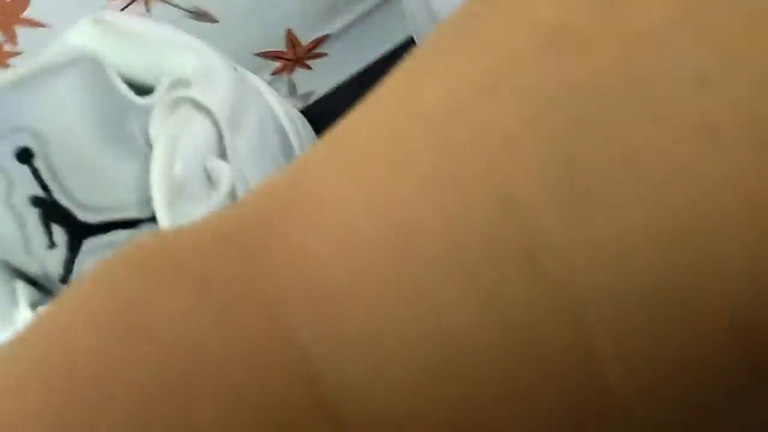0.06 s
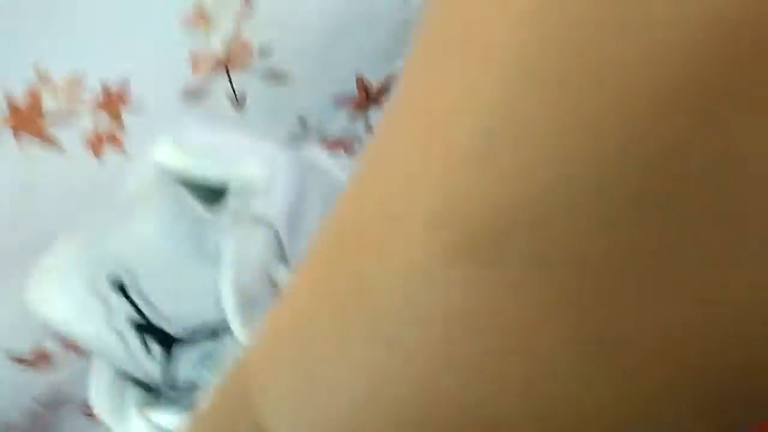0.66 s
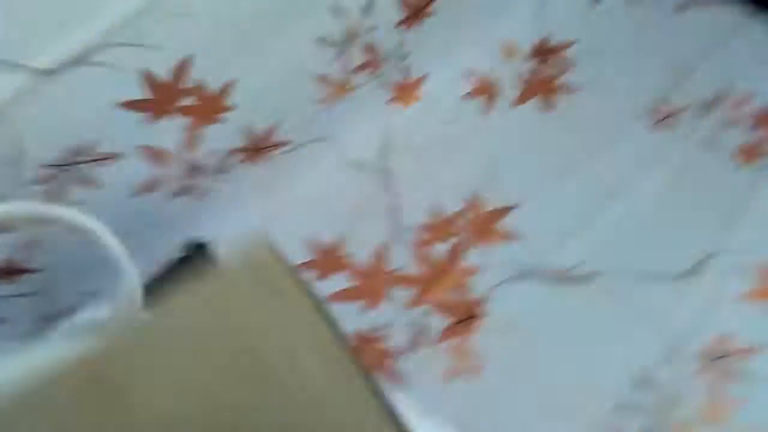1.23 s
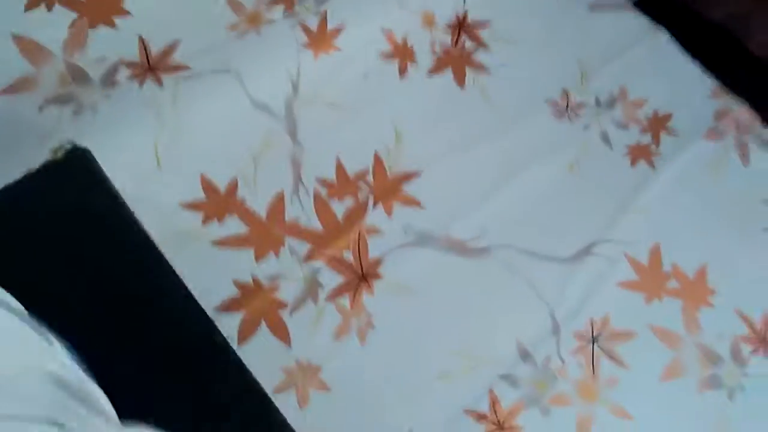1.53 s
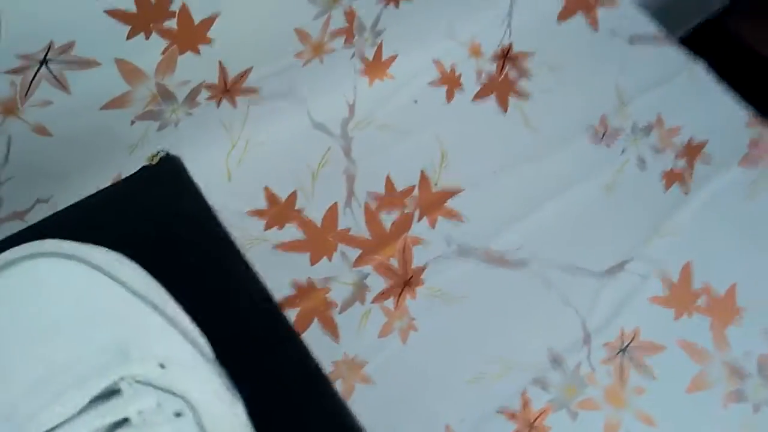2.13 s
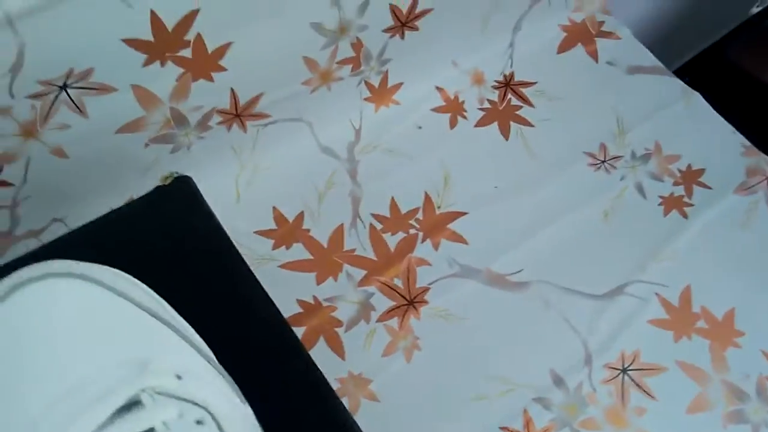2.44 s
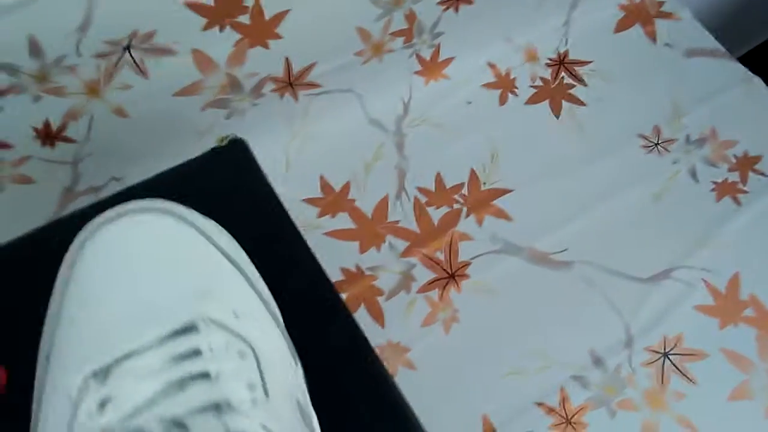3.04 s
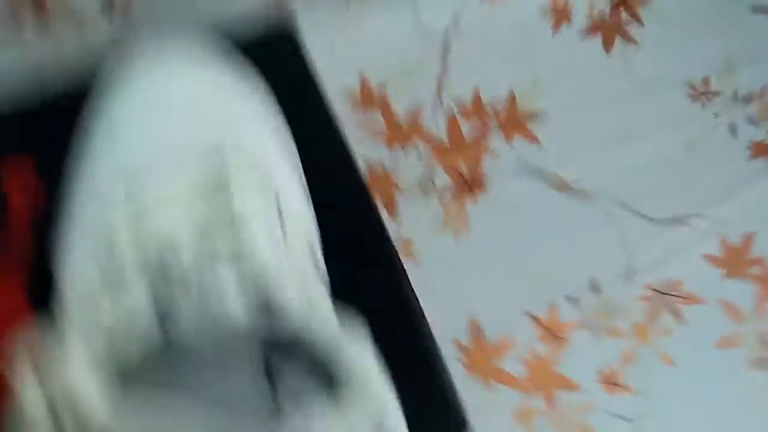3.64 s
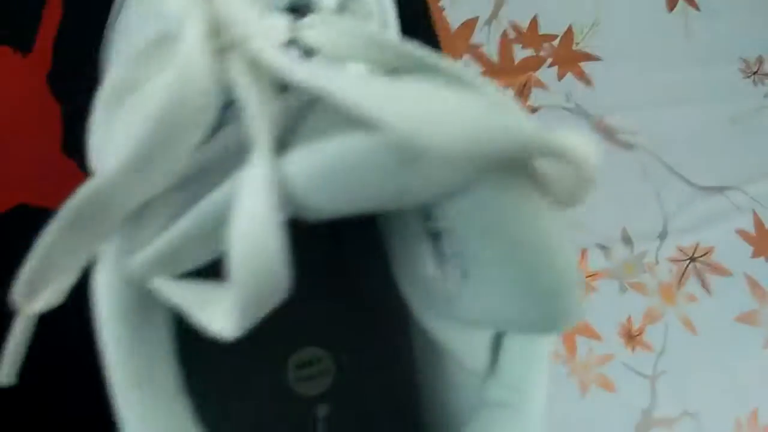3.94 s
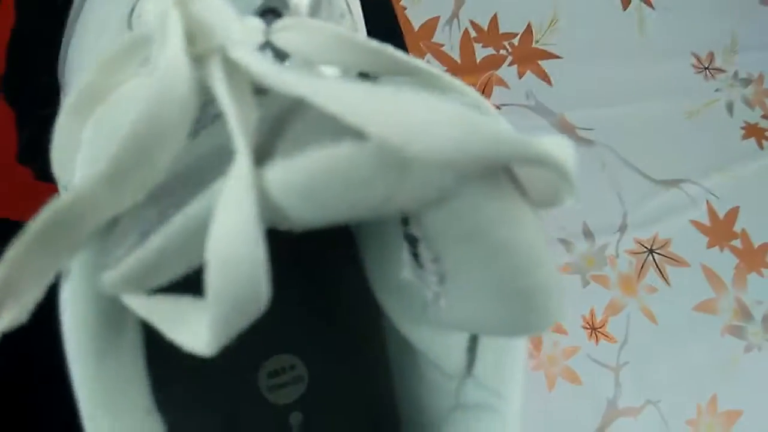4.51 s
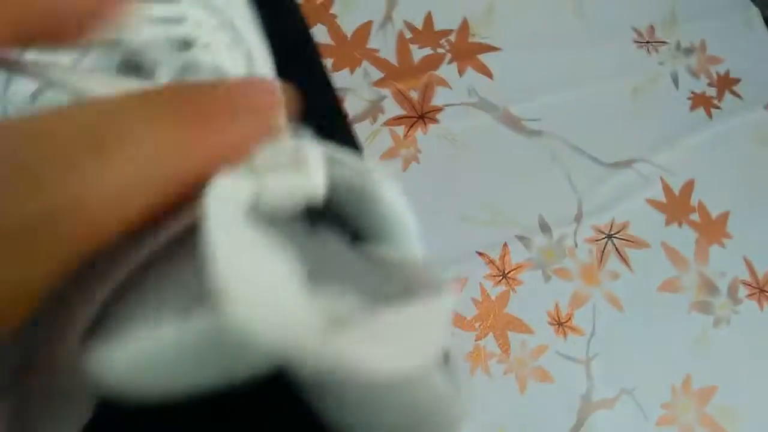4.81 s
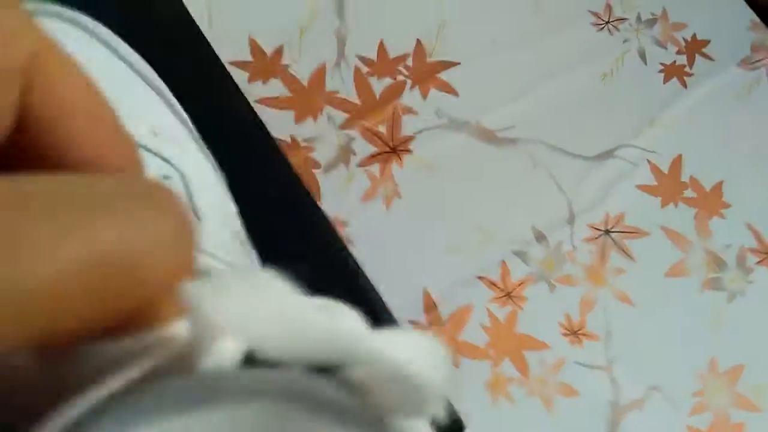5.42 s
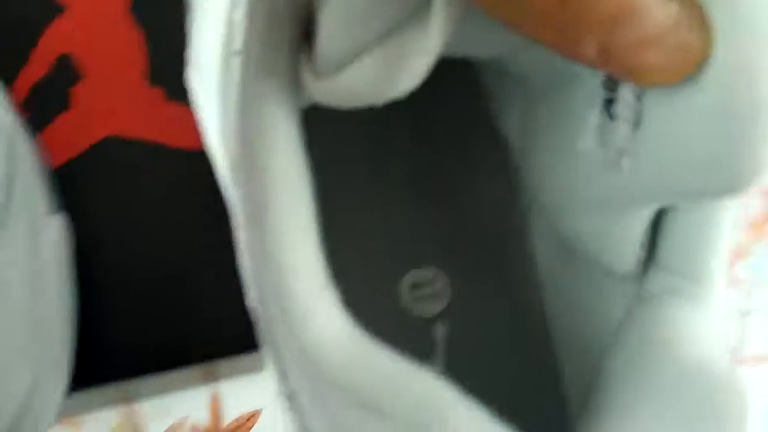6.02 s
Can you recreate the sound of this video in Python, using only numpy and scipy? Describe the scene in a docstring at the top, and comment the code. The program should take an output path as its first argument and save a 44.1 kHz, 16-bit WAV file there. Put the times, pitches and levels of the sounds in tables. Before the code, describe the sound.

A hand brushes over the microphone, then a sneaker thumps onto a cardboard box as fingers rustle its leather and laces.

```python
"""Sneaker on a shoe box

A leather sneaker is picked up, turned and set down on its cardboard box, close to a hand-held phone in
a small room. First a hand slides over the phone's case, right by the left microphone port; then fingers
brush leather and laces, the rubber sole thumps on the hollow box, and the case ticks in the grip."""
import sys
import numpy as np
from scipy import signal
from scipy.fft import rfft, irfft, next_fast_len
from scipy.io import wavfile
from scipy.ndimage import map_coordinates

SR = 44100
rng = np.random.default_rng(int(sys.argv[2]) if len(sys.argv) > 2 else 0)


def generate_wav(signal):
    """Clip the signal to [-1, 1] and save it as 16-bit WAV at the path in sys.argv[1]."""
    frames = np.transpose(np.atleast_2d(signal))
    scaled = np.clip(frames, -1, 1) * 32767
    pcm = np.round(scaled).astype(np.int16)
    wavfile.write(sys.argv[1], SR, pcm)


N = 276507

TURNED_S = 3.8  # from here on the fingers work at the collar
# resonances of the leather upper: centre_hz, width_hz, level_db
UPPER_MODES = [(550, 330, -6.5), (692, 140, 1.5), (1343, 200, 1.5), (1707, 290, -3), (2340, 460, -4.5),
               (3020, 540, -6), (4200, 1500, -7)]
# resonances of the hollow collar and tongue: centre_hz, width_hz, level_db
COLLAR_MODES = [(541, 98, -0.5), (654, 95, 3.5), (863, 140, 4), (1724, 280, -1), (2233, 910, -2.5),
                (2960, 450, 0), (4580, 900, -7)]
# bright swish of fabric: freq_hz, level_db
FABRIC_EQ = [(1500, -10), (3000, -3.5), (5000, -5), (7000, 2.5), (8200, 1.5), (9500, -5), (12500, -5),
             (14400, -6)]
# low handling rumble: freq_hz, level_db
RUMBLE_EQ = [(25, -26.5), (45, 0), (65, 1.5), (95, -3.5), (135, -1), (170, -5), (230, -6), (400, -8),
             (700, -13.5), (1500, -23.5)]
# stereo balance near the covered port: freq_hz, left_over_right_db
COVERED_PAN = [(100, -2), (350, 6.5), (800, 9.5), (2000, 8.5), (4500, 7), (7500, 0), (10000, 27),
               (14000, 16)]
# stereo balance with both ports free: freq_hz, left_over_right_db
OPEN_PAN = [(200, -1.5), (2000, 1), (6000, 2.5), (9000, 3), (11000, 10), (14000, 0.5)]


def sole_thumps(attack_s=0.0019, sole_t60_s=0.056):
    """The rubber sole gives a dead knock and rings the box modes near its own pitch."""
    # soft knocks of sole and hand: start_s, level_db, pitch_hz
    knocks = [(1.071, -32.5, 84), (1.613, -23, 239), (1.954, -16.5, 264), (2.032, -17, 237),
              (2.142, -23, 174), (2.26, -28, 176), (2.432, -19.5, 166), (2.785, -31, 202),
              (3.039, -20, 150), (3.092, -1, 222), (3.168, -17, 246), (3.286, -23.5, 73),
              (3.371, -5.5, 177), (3.391, -19.5, 84), (3.427, -22.5, 291), (3.453, -19, 260),
              (3.529, -19.5, 135), (3.563, -25, 211), (3.652, -26, 206), (3.973, -6, 316),
              (3.98, -11.5, 141), (4.107, -27, 155), (4.677, -21.5, 134), (4.778, -26.5, 151),
              (5.096, -28, 233)]
    # modes of the cardboard box: pitch_hz, level_db, t60_s
    box_modes = [(65.5, -10, 0.29), (133.6, -5.5, 0.2), (223, -3, 0.052), (257.5, -0.5, 0.039),
                 (348, -6, 0.055), (367, -17, 0.093), (478, -7.5, 0.052), (551.4, -17.5, 0.12)]
    out, t = np.zeros((2, N)), np.arange(SR // 2) / SR
    hz, mode_db, t60 = np.transpose(box_modes)[:, :, None]
    for start, db, pitch_hz in knocks:
        # the shoe loads the box a little differently each time
        strength = band(hz, pitch_hz, octaves=1.03) * amp(mode_db + rng.standard_normal(hz.shape))
        detune = 1 + 0.035 * rng.standard_normal(hz.shape)
        box = np.sum(strength * amp(-60 * t / t60) * np.sin(2 * np.pi * hz * detune * t), 0)
        sole = amp(-60 * t / sole_t60_s) * np.sin(2 * np.pi * pitch_hz * t)
        thump = (box + sole) * (1 - np.exp(-t / attack_s))
        add(out, start, amp(db - 2) * thump / abs(thump).max() * panned(-2.4))
    return out


def hand_on_case():
    """Skin hisses over the port, scrapes the case, drags in coarse slips and rocks the phone."""
    # swipes of the hand: start_s, rise_s, hold_s, hiss_db, scrape_offset_db, rocking_offset_db
    swipes = [(-.01, 0.017, 0.18, -40, -5.5, -11), (0.188, 0.031, 0.057, -44.5, -5.5, 5),
              (.27, 0.006, 0.13, -47.5, -13.5, -4.5), (.385, 0.051, 0.047, -46, -1, 6),
              (0.429, 0.18, 0.0077, -17.5, -8.5, -15), (0.595, 0.026, 0.0072, -19, -3.5, -9.5),
              (.635, 0.03, 0.1, -35, 0, 3.5), (.72, 0.05, 0.048, -20.5, -7, -6.5),
              (0.844, 0.038, 0.038, -31, -2, 3.5), (.915, 0.011, 0.077, -35.5, -6, -14.5),
              (.975, 0.044, 0.014, -49.5, -2.5, -7), (1.04, 0.0072, 0.27, -55, -10.5, -13.5)]
    # airy glide of skin: freq_hz, level_db
    hiss_eq = [(2500, -51.5), (4500, -8), (6200, 2), (8000, 4), (10000, -5), (12500, -0.5), (14400, -2.5)]
    # gritty midrange scrape: freq_hz, level_db
    scrape_eq = [(400, -19.5), (900, -5), (1450, -1), (2100, -6), (3000, -7), (5000, -7.5), (8000, -24.5)]
    # dull drag: freq_hz, level_db
    drag_eq = [(60, -31), (200, -0.5), (400, -3), (700, 3), (1000, -16.5), (2000, -16.5)]
    moves = [(start, rise, hold, db, db + scrape_db, db + rock_db)
             for start, rise, hold, db, scrape_db, rock_db in swipes]
    hiss_env, scrape_env, rock_env = pressure(moves, sag_db_per_s=30, release_s=0.057, linger_db=-15.5)
    drag_env = scrape_env.max() * (scrape_env / scrape_env.max()) ** 0.83  # grows slower than the scrape
    glide = friction(slips_per_s=4000, spread_db=2, smooth=1.4, judder_db=1.2, judder_hz=150)
    hiss = hiss_env * at_ports(glide, eq(hiss_eq), COVERED_PAN)
    crackle = grit(count=16000, spread_db=2.2, t60_s=0.007) + 0.8 * rng.standard_normal((2, N))
    scrape = scrape_env * at_ports(crackle, eq(scrape_eq), COVERED_PAN)
    slips = friction(slips_per_s=230, spread_db=1.5, smooth=0.95, judder_db=-0.5, judder_hz=480)
    drag = drag_env * at_ports(slips, eq(drag_eq), COVERED_PAN)
    jolts = friction(slips_per_s=220, spread_db=1.5, smooth=0.57, judder_db=2, judder_hz=20)
    rocking = rock_env * at_ports(jolts, eq(RUMBLE_EQ), [(100, 11)])  # leans left at every pitch
    return hiss + scrape + amp(-1.5) * drag + amp(-2) * rocking


def finger_strokes():
    """Fingers swish on the fabric and rub the upper or, once the shoe is turned, its collar."""
    # strokes over the shoe: start_s, rise_s, hold_s, swish_db, rub_db
    strokes = [(1.49, .035, 0.1, -51.5, -53.5), (1.58, 0.035, 0.017, -35, -37.5),
               (1.66, .02, 0.065, -53, -57.5), (1.795, 0.05, 0.01, -39.5, -62),
               (1.87, 0.019, 0.07, -51.5, -58.5), (1.94, 0.029, 0.014, -42, -41),
               (2.01, 0.023, 0.21, -48.5, -48.5), (2.22, 0.044, .05, -50.5, -57.5),
               (2.365, .025, 0.059, -45, -53), (2.51, 0.069, 0.068, -49.5, -47),
               (2.735, 0.032, 0.033, -44.5, -41), (2.8, .07, 0.02, -32.5, -37),
               (2.87, 0.14, 0.15, -35, -36), (3.158, 0.012, 0.081, -35.5, -34),
               (3.23, 0.042, 0.046, -26.5, -46.5), (3.33, 0.027, 0.018, -38.5, -34),
               (3.41, 0.024, 0.043, -38, -58.5), (3.51, 0.014, 0.17, -57.5, -59.5),
               (3.965, 0.014, 0.19, -44.5, -52.5), (4.15, 0.026, 0.18, -55, -84),
               (4.338, 0.0089, 0.0048, -37, -34.5), (4.355, 0.015, 0.082, -46.5, -40.5),
               (4.685, 0.022, 0.051, -52, -42.5), (4.79, 0.036, 0.061, -49, -55),
               (4.93, 0.058, 0.17, -52, -54), (5.15, .08, .3, -59, -76.5), (5.58, .17, .03, -62.5, -92),
               (6.185, 0.02, 0.07, -63, -87)]
    # the fingers leave the shoe and cut the stroke short: time_s
    lifts = [2.681, 3.128, 3.481, 4.145]
    swish_env, rub_env = pressure(strokes, sag_db_per_s=28, release_s=0.26, linger_db=-2, lifts=lifts)
    weave = friction(slips_per_s=2500, spread_db=1, smooth=1.2, judder_db=1.4, judder_hz=110)
    # threads and stitches catch
    snags = unit(friction(slips_per_s=160, spread_db=5, smooth=0, judder_db=13, judder_hz=13))
    fabric = at_ports(unit(weave) + amp(-17.5) * snags, eq(FABRIC_EQ), OPEN_PAN)
    grain = grit(count=14000, spread_db=3, t60_s=0.011) * amp(2 * wobble(40))
    force = grain + amp(-11) * snags
    upper = at_ports(force, ringing(UPPER_MODES), OPEN_PAN)
    collar = at_ports(force, ringing(COLLAR_MODES), OPEN_PAN)
    leather = np.where(np.arange(N) / SR < TURNED_S, flexing(upper), collar)
    return swish_env * fabric + amp(-3.5) * rub_env * leather


def finger_taps(octaves=0.64):
    """A short, dry crunch rings part of the shoe's shell, with a bright snap on top."""
    # fingers and lace ends tap and catch: start_s, level_db, centre_hz, t60_s
    taps = [(0.617, -11.5, 1040, 0.03), (.949, -18, 1900, 0.014), (1.874, -39, 1310, .02),
            (1.953, -34, 1300, .03), (2.5128, -20.5, 1070, 0.044), (3.033, -16.5, 2780, 0.055),
            (3.036, -10.5, 1510, 0.022), (3.092, -10.5, 1740, 0.035), (3.272, -13, 1030, 0.016),
            (3.37, -18.5, 980, 0.036), (3.451, -22, 810, 0.034), (3.531, -31.5, 893, 0.044),
            (3.9695, -25.5, 1050, 0.055), (4.018, -24, 855, 0.022), (4.3433, -20.5, 1810, 0.03),
            (4.35, -24, 2200, 0.029), (4.403, -23, 1290, 0.023), (4.411, -23.5, 1330, 0.04),
            (4.462, -28, 1250, 0.02), (4.673, -26.5, 1460, 0.032), (4.777, -29.5, 445, 0.046),
            (4.972, -35, 585, .035), (5.095, -35.5, 880, 0.03)]
    out, t = np.zeros((2, N)), np.arange(SR // 6) / SR
    for start, db, centre_hz, t60 in taps:
        envelope = hit_envelope(t, t60, attack_s=0.00049)
        balance = COVERED_PAN if start < 1 else OPEN_PAN
        shell = ringing(UPPER_MODES if start < TURNED_S else COLLAR_MODES)
        crunch = lambda colour: at_ports(envelope * rng.standard_normal((2, len(t))), colour, balance)
        body = crunch(lambda hz: shell(hz) * band(hz, centre_hz, octaves))
        crack = crunch(lambda hz: band(hz, centre_hz, octaves))
        snap = crunch(eq(FABRIC_EQ))
        tap = body + amp(-8) * crack + amp(-11) * snap
        add(out, start, amp(db - 2.5) * tap / abs(tap.mean(0)).max())
    return out


def case_ticks(t60_s=0.0068, attack_s=0.00008, slip_s=0.0015, ring_hz=4060, ring_t60_s=0.05):
    """The plastic case cracks, slips once more and rings faintly."""
    # ticks in the grip: start_s, level_db, pitch_hz, left_over_right_db
    ticks = [(0.2303, -10.5, 7400, -1), (0.3785, -6, 9200, 12), (0.3845, -11.5, 6170, -6.5),
             (0.66, -10.5, 11500, 15), (0.9038, -13.5, 5420, 11), (0.906, -4.5, 7200, 9.5),
             (0.9495, -11.5, 6170, 5.5), (1.6592, -17.5, 5950, -6.5), (1.9812, -21.5, 6740, -10.5),
             (2.017, -25.5, 6620, 6.5), (2.108, -31, 6390, -1.5), (2.5118, -32, 9000, 19),
             (3.0362, -16, 5625, 7.5), (3.0815, -9, 6700, -10), (3.271, -19, 3680, 9),
             (3.357, -16, 6800, -4), (3.627, -31, 8000, 1), (4.35, -18.5, 6160, 0), (4.373, -28, 7160, -2),
             (4.411, -22.5, 6200, 0), (4.975, -25.5, 6160, -6)]
    out, t = np.zeros((2, N)), np.arange(SR // 30) / SR
    second_slip = hit_envelope(np.maximum(t - slip_s, 0), t60_s, attack_s)
    envelope = hit_envelope(t, t60_s, attack_s) + amp(-6) * second_slip
    ring = amp(-21.5 - 60 * t / ring_t60_s) * np.sin(2 * np.pi * ring_hz * t)
    for start, db, pitch_hz, pan_db in ticks:
        burst = rng.standard_normal((2, len(t))) * envelope
        pan = lambda hz: panned(pan_db + along(OPEN_PAN, hz) - along(OPEN_PAN, pitch_hz))
        crack = filtered(burst, lambda hz: band(hz, pitch_hz, octaves=0.55) * pan(hz))
        tick = crack / abs(crack.mean(0)).max() + ring * band(ring_hz, pitch_hz, octaves=0.66)
        add(out, start, amp(db) * tick)
    return out


def palm_bumps(t60_cycles=10):
    """Dull knocks through the case, dead within a few cycles and loudest at the covered port."""
    # the palm meets the case: start_s, level_db, pitch_hz
    bumps = [(0.142, -25, 700), (0.373, -26.5, 310), (0.3785, -22, 2200), (0.397, -30, 375),
             (0.4172, -30, 560), (.535, -16, 455), (0.618, -13, 447), (0.886, -18, 720), (0.9059, -11, 750)]
    out, t = np.zeros((2, N)), np.arange(SR // 20) / SR
    for start, db, pitch_hz in bumps:
        envelope = hit_envelope(t, t60_cycles / pitch_hz, attack_s=0.000067)
        knock = envelope * np.sin(2 * np.pi * pitch_hz * t)
        add(out, start, amp(db) * knock / abs(knock).max() * panned(along(COVERED_PAN, pitch_hz)))
    return out


def shoe_slides():
    """The shoe's weight rumbles as it slides on the box, each shove at its own depth."""
    # shoves along the box: start_s, rise_s, hold_s, level_db, centre_hz
    shoves = [(1.592, 0.026, 0.1, -46.5, 111), (1.85, 0.039, 0.57, -50.5, 218),
              (2.37, 0.044, 0.09, -38.5, 204), (2.745, 0.023, 0.017, -40, 199),
              (3.02, 0.023, 0.2, -40, 122), (3.34, 0.02, 0.12, -31, 242), (3.525, 0.0078, 0.028, -33, 80),
              (3.978, 0.0193, 0.086, -46, 251), (4.333, 0.019, 0.046, -35.5, 78),
              (4.672, 0.026, 0.3, -44.5, 120), (5.045, 0.028, 0.023, -43.5, 121.4)]
    out = np.zeros((2, N))
    slips = friction(slips_per_s=500, spread_db=1, smooth=0.8, judder_db=1.5, judder_hz=25)
    rumble = at_ports(slips, eq(RUMBLE_EQ), OPEN_PAN)
    for *move, centre_hz in shoves:
        envelope, = pressure([move], sag_db_per_s=35.5, release_s=0.47, linger_db=-19)
        out += envelope * unit(filtered(rumble, lambda hz: band(hz, centre_hz, octaves=1.6)))
    return amp(1) * out


def leather_squeaks():
    """Stick and slip: a band of scuffing, broader the higher it lies, that sinks as the finger slows."""
    # skin catches on leather: start_s, length_s, start_hz, end_hz, level_db
    squeaks = [(0.144, 0.007, 2600, 2460, -32.5), (1.793, 0.056, 2770, 2110, -47),
               (4.35, 0.1, 880, 786, -48), (4.689, 0.083, 1150, 985, -48)]
    out = np.zeros((2, N))
    for start, length, start_hz, end_hz, db in squeaks:
        n = int(length * SR)
        width_hz = start_hz ** 2 / 17000
        flutter = unit(filtered(rng.standard_normal((2, n)), lambda hz: np.exp(-(hz / width_hz) ** 2)))
        tone = np.sin(2 * np.pi * np.cumsum(np.linspace(start_hz, end_hz, n)) / SR)
        add(out, start, amp(db) * unit(flutter * tone * signal.windows.tukey(n, 0.15)))
    return out


def room_reverb(send, predelay_s=0.0047):
    """Close walls answer with a short tail, the treble dying first."""
    # decay of the small room: freq_hz, t60_s
    decay_times = [(120, 0.17), (400, .38), (2000, 0.26), (10000, 0.14)]
    hz, t, spectrum = signal.stft(rng.standard_normal((2, SR // 2)), SR, nperseg=256)
    decay = amp(-60 * t / along(decay_times, hz)[:, None])
    _, tail = signal.istft(spectrum * decay, SR, nperseg=256)
    tail = at_ports(tail, np.ones_like, OPEN_PAN)
    tail = np.pad(tail, ((0, 0), (int(predelay_s * SR), 0)))
    return signal.fftconvolve(send.mean(0)[None], tail / np.linalg.norm(tail[0]), axes=1)[:, :N]


def room_tone():
    """A steady bed of quiet room air and microphone hiss."""
    # colour of the bed: freq_hz, level_db
    air_eq = [(22, -10.5), (50, -4.5), (130, -5.5), (240, -12.5), (360, -11), (600, -16.5), (950, -18),
              (1500, -31), (2150, -24), (3000, -30.5), (5500, -30.5), (7500, -20), (10000, -26),
              (14400, -26)]
    return amp(-59.5) * at_ports(rng.standard_normal((2, N)), eq(air_eq), [(100, 0.5), (10000, -0.5)])


def pressure(moves, sag_db_per_s, release_s, linger_db, lifts=(), linger_t60_s=0.26, lift_t60_s=0.052):
    """Moves swell, sag and let go to a light touch that a lift cuts off; one envelope per dB column."""
    power, t = 0, np.arange(N) / SR
    for start, rise, hold, *levels_db in moves:
        swell = np.sin(np.pi / 2 * np.clip((t - start) / rise, 0, 1)) ** 2
        held_s = np.clip(t - start - rise, 0, hold)
        after_s = np.maximum(t - start - rise - hold, 0)
        fade_db = np.maximum(-60 * after_s / release_s, linger_db - 60 * after_s / linger_t60_s)
        next_lift = min([lift for lift in lifts if lift > start], default=np.inf)
        lifted_s = np.clip(t - next_lift, 0, lift_t60_s)
        envelope = swell * amp(fade_db - sag_db_per_s * held_s - 60 * lifted_s / lift_t60_s)
        power += np.outer(amp(levels_db), envelope) ** 2
    return np.sqrt(power)


def friction(slips_per_s, spread_db, smooth, judder_db, judder_hz):
    """Tiny slips of uneven size over a smooth hiss, clumped by the judder of the contact."""
    slips = rng.random(N) < slips_per_s / SR
    sizes = amp(spread_db * np.minimum(rng.exponential(size=N), np.pi))
    force = unit(slips * sizes * rng.standard_normal((2, N))) + smooth * rng.standard_normal((2, N))
    return force * amp(judder_db * wobble(judder_hz))


def grit(count, spread_db, t60_s, top_hz=7000):
    """A crowd of tiny catches, each a brief ping at its own pitch and size."""
    t, channels = np.arange(SR // 150) / SR, []
    for start, pitch, chance in rng.random((2, 3, count, 1)):
        size = amp(-spread_db * np.log(np.maximum(chance, np.exp(-np.pi))))
        pings = size * amp(-60 * t / t60_s) * np.sin(2 * np.pi * top_hz * pitch * t)
        samples = (start * N).astype(int) + np.arange(len(t))
        channels.append(np.bincount(samples.ravel(), pings.ravel(), N)[:N])
    return unit(np.array(channels))


def ringing(modes):
    """The response of a damped shell: resonances of alternating polarity."""
    return lambda hz: sum((-1) ** k * amp(db) * 1j * hz * width / (centre**2 - hz**2 + 1j * hz * width)
                          for k, (centre, width, db) in enumerate(modes))


def flexing(x, depth=0.035, bends_per_s=8):
    """The resonances in x wander up and down as the leather bends."""
    position = np.cumsum(1 + depth * wobble(bends_per_s))
    return np.array([map_coordinates(side, [position], mode="mirror") for side in x])


def at_ports(pair, colour, balance):
    """Two unrelated signals become coloured stereo, narrow in the bass, with mid rms 1."""
    # likeness of the two ports: freq_hz, correlation
    likeness = [(100, 0.95), (400, 0.76), (1000, 0.21), (2000, 0), (5000, 0)]
    angle = lambda hz: np.arccos(along(likeness, hz)) / 2
    mid, side = filtered(pair, lambda hz: colour(hz) * np.array([np.cos(angle(hz)), np.sin(angle(hz))]))
    out = filtered(np.array([mid + side, mid - side]), lambda hz: panned(along(balance, hz)))
    return out / (out.mean(0).std() + 1e-12)


def hit_envelope(t, t60_s, attack_s):
    """A fast rise into an exponential decay."""
    return amp(-60 * t / t60_s) * (1 - np.exp(-t / attack_s))


def wobble(rate):
    """A smooth random curve, rate knots a second."""
    knots = rng.standard_normal(int(N * rate / SR) + 4)
    return map_coordinates(knots, [np.arange(N) * rate / SR])


def filtered(x, response):
    """Shape x with a gain that depends on frequency."""
    n = x.shape[-1]
    padded = next_fast_len(n + 8192)
    return irfft(rfft(x, padded) * response(np.fft.rfftfreq(padded, 1 / SR)), padded)[..., :n]


def band(hz, centre_hz, octaves):
    """A soft band about a centre frequency."""
    return 1 / (1 + (np.log2((hz + 1) / centre_hz) / octaves) ** 2)


def eq(points):
    """The response of a (freq_hz, level_db) curve."""
    return lambda hz: amp(along(points, hz))


def along(points, hz):
    """Read (freq_hz, value) points on a log axis."""
    freqs, values = np.transpose(points)
    return np.interp(np.log(hz + 1), np.log(freqs + 1), values)


def panned(db):
    """Left and right gains for a level difference."""
    return amp(np.array([db, -db]).reshape(2, -1) / 2)


def amp(db):
    """Decibels to gain."""
    return 10 ** (np.asarray(db) / 20)


def unit(x):
    """Scale to rms 1."""
    return x / np.sqrt(np.mean(x ** 2) + 1e-20)


def add(track, start_s, sound):
    """Mix a sound in at start_s."""
    part = track[:, max(round(start_s * SR), 0):][:, :sound.shape[-1]]
    part += sound[..., :part.shape[1]]


def scene():
    """Thumps and fingers feed the room; the slides and the phone's case stay dry."""
    thumps = sole_thumps()
    fingers = finger_taps() + leather_squeaks() + finger_strokes()
    air = room_tone()
    reverb = room_reverb(amp(-11) * thumps + amp(-7.5) * fingers)
    shoe = thumps + fingers + reverb + shoe_slides()
    case = hand_on_case() + palm_bumps() + case_ticks()
    return shoe + case + air


def record(dry, low_cut_hz=45, top_hz=14350):
    """The phone sheds the deepest bass, clips at full scale and keeps nothing above its band limit."""
    thinned = signal.sosfilt(signal.butter(4, low_cut_hz, "high", fs=SR, output="sos"), dry)
    return filtered(np.clip(thinned, -1, 1), lambda hz: hz < top_hz)


dry = scene()
out = record(dry)
generate_wav(out)
```